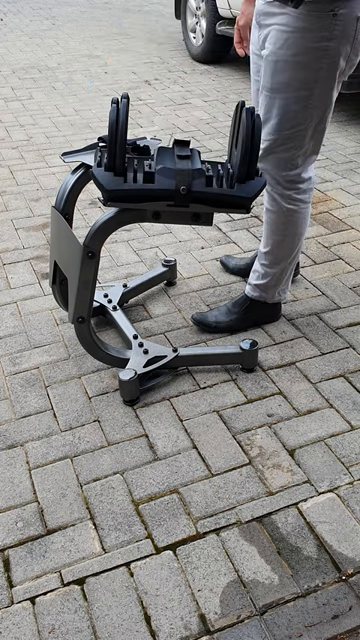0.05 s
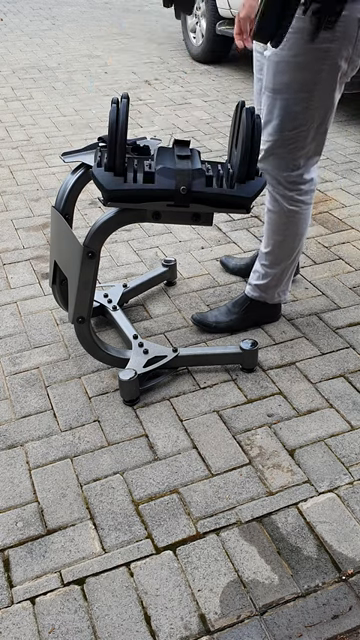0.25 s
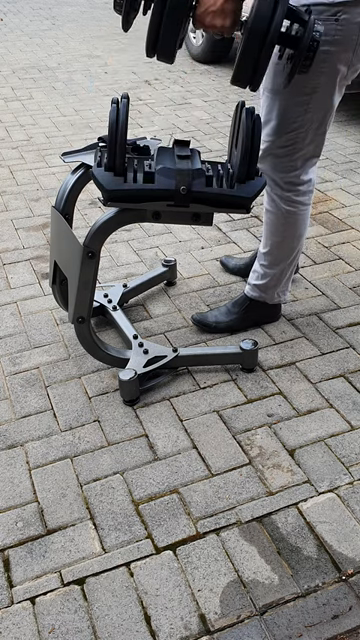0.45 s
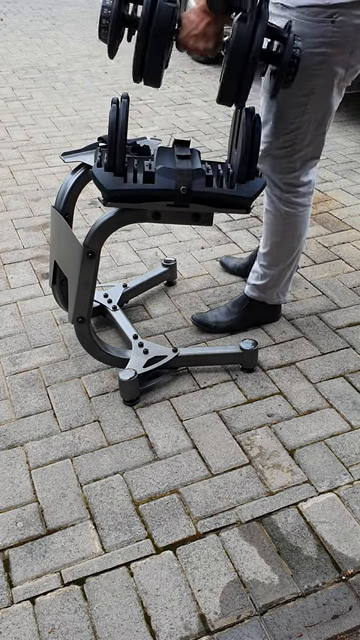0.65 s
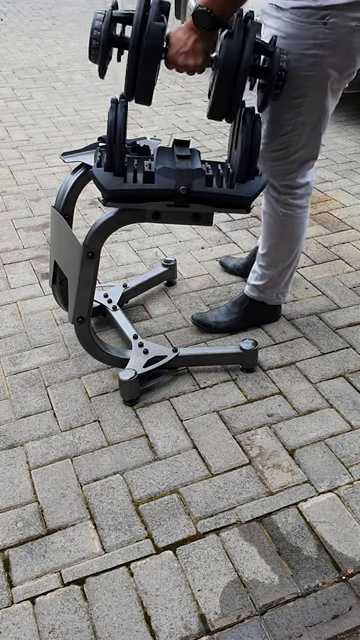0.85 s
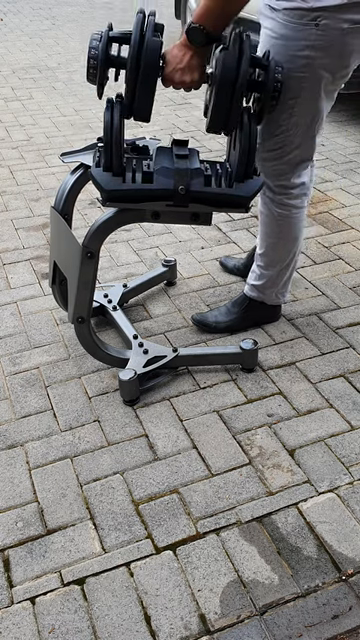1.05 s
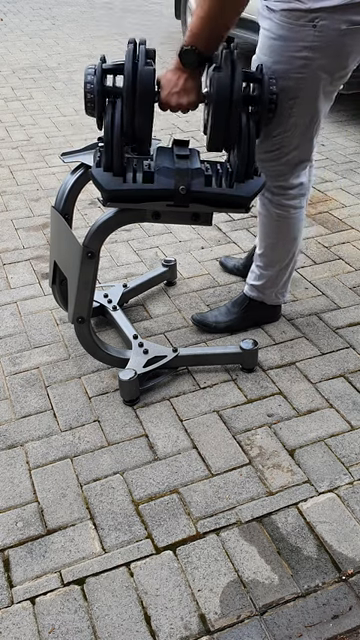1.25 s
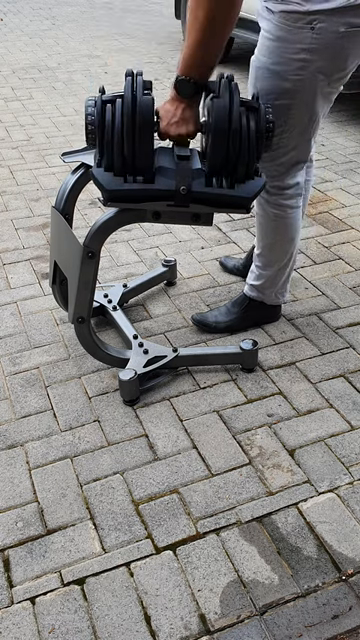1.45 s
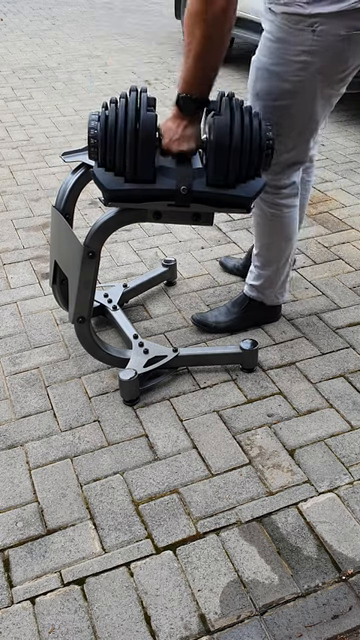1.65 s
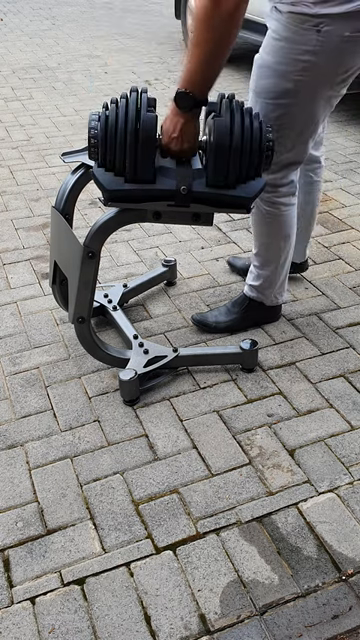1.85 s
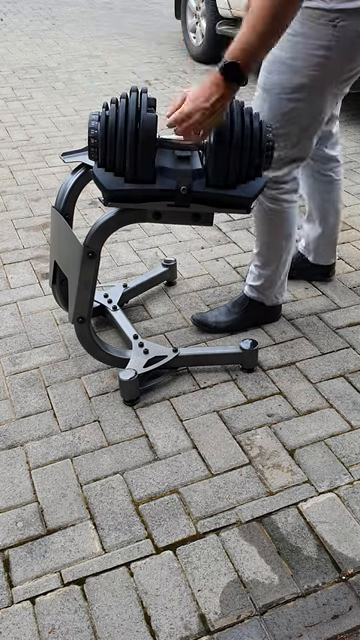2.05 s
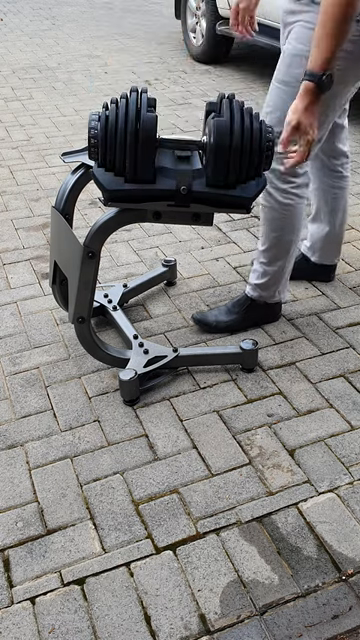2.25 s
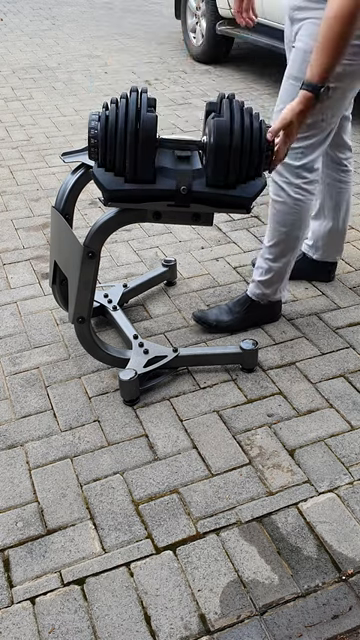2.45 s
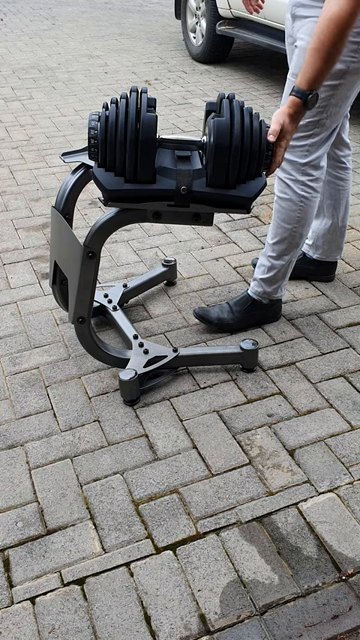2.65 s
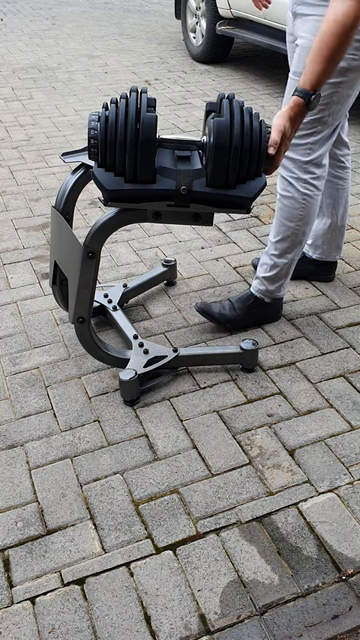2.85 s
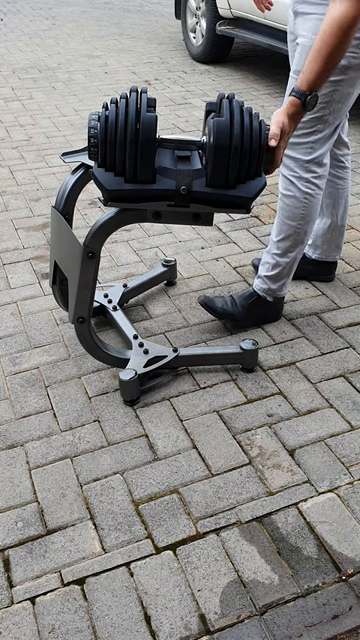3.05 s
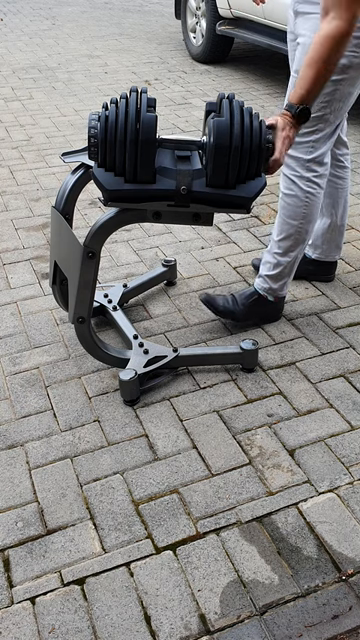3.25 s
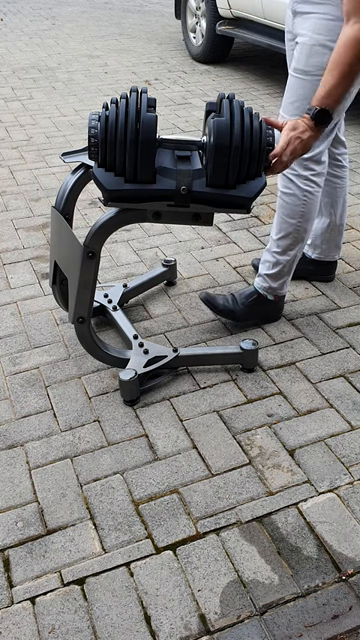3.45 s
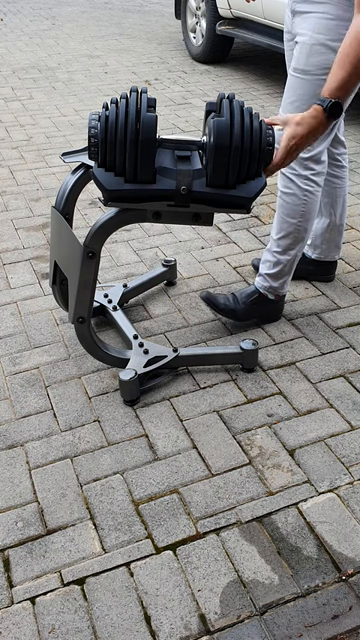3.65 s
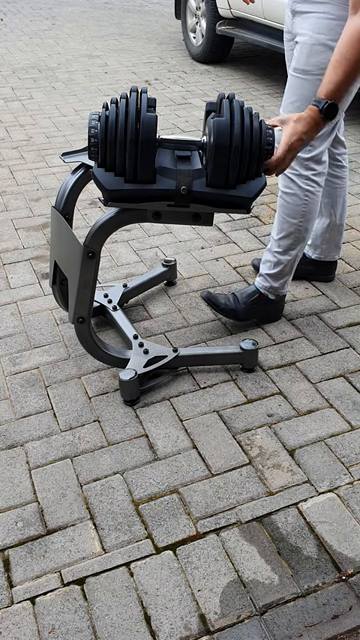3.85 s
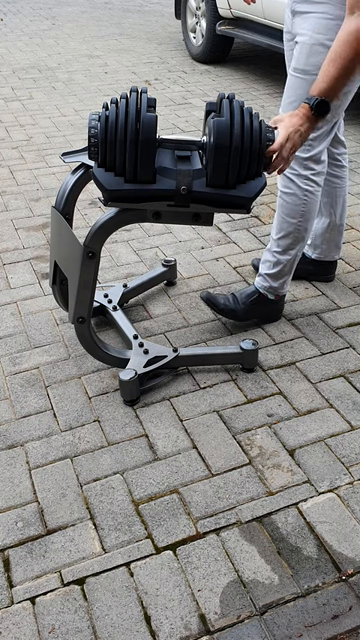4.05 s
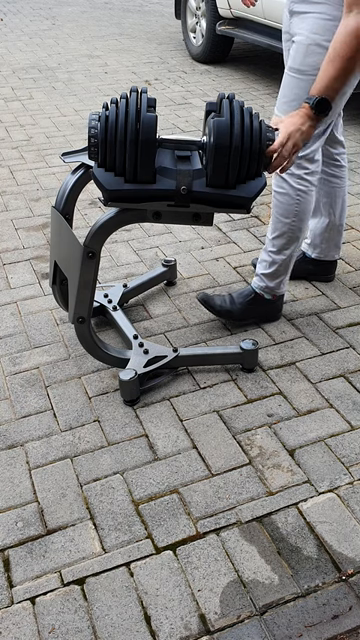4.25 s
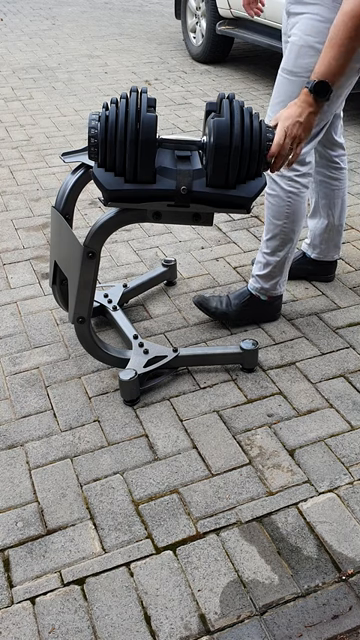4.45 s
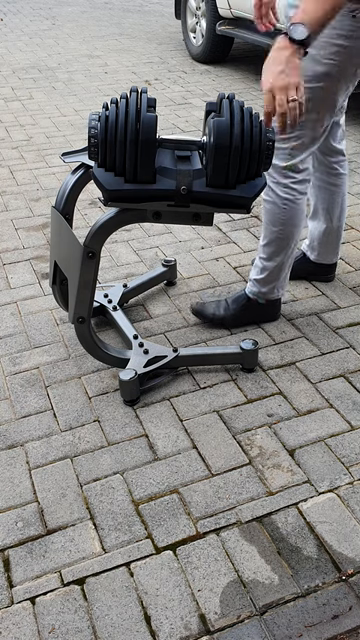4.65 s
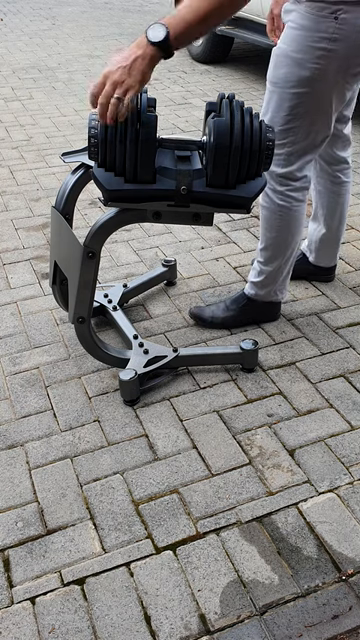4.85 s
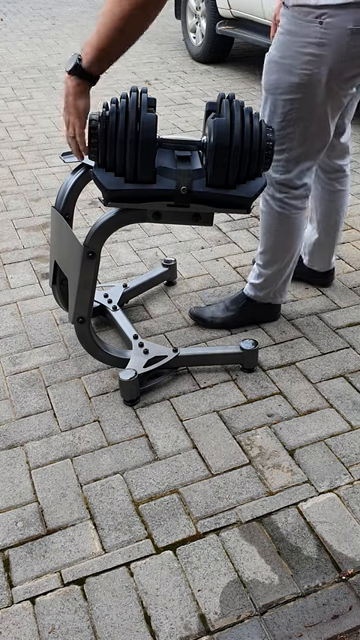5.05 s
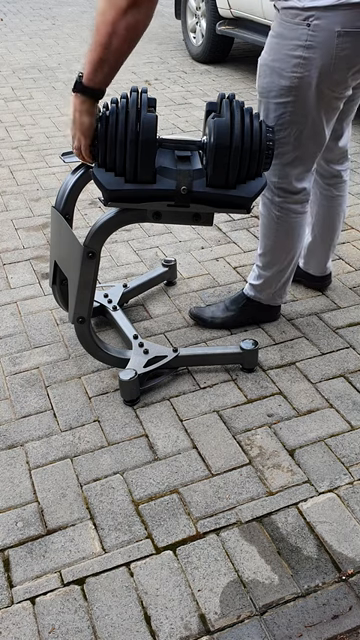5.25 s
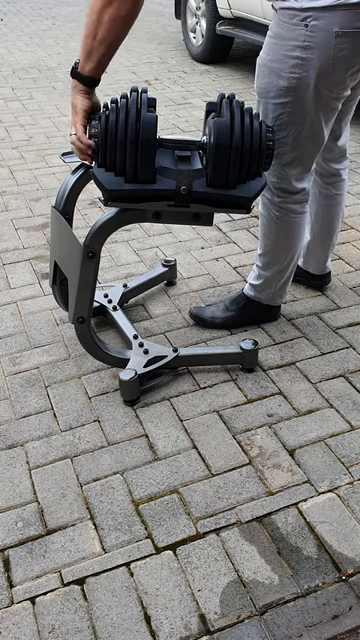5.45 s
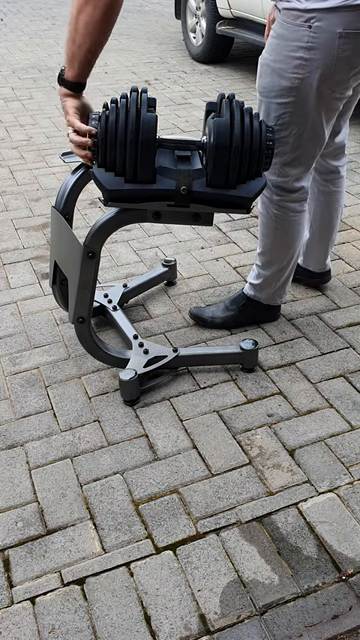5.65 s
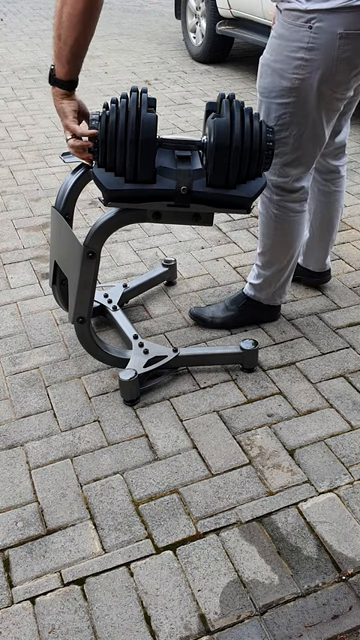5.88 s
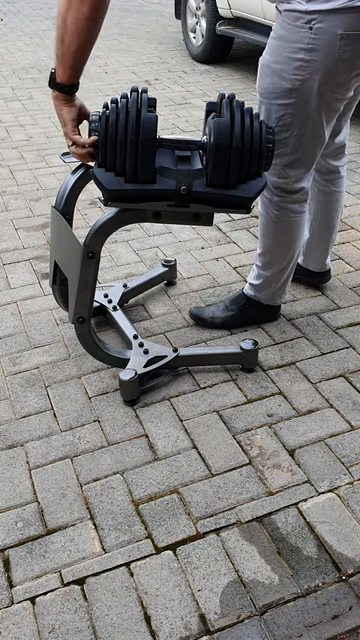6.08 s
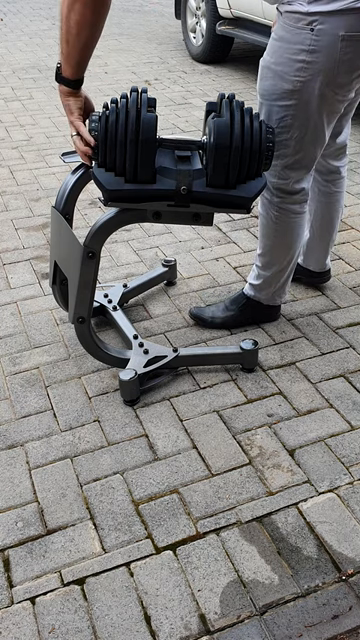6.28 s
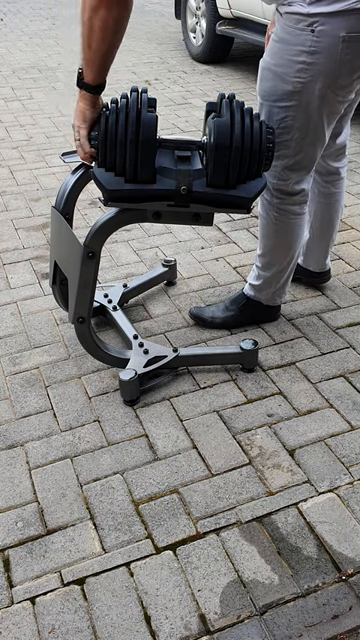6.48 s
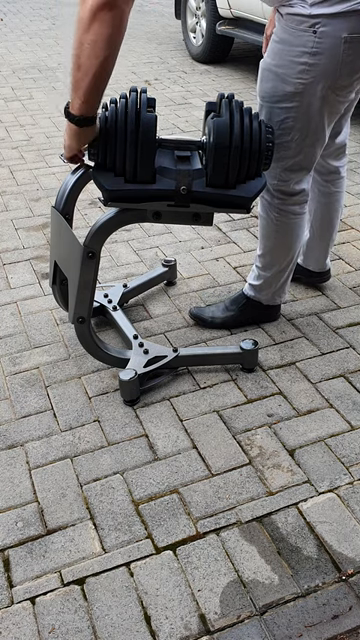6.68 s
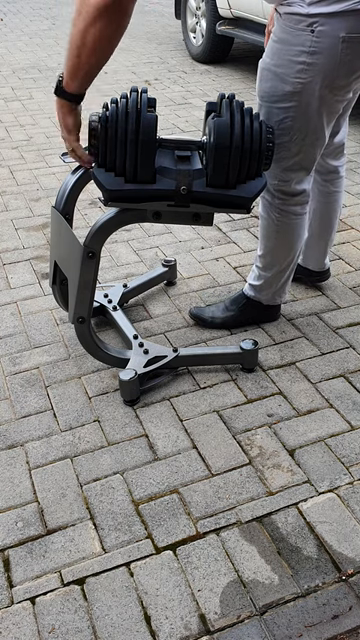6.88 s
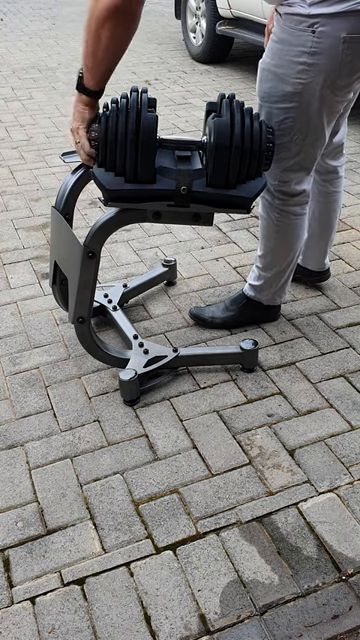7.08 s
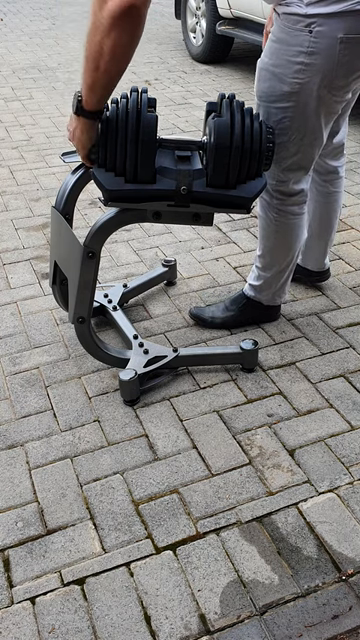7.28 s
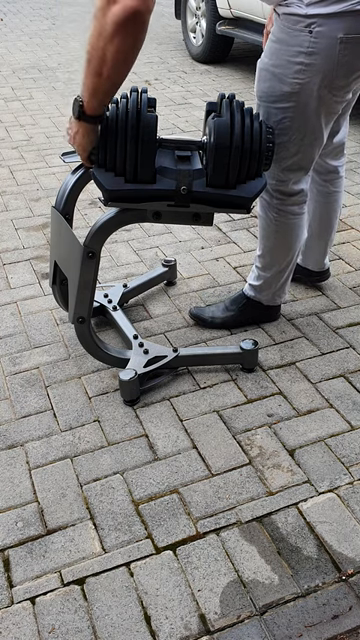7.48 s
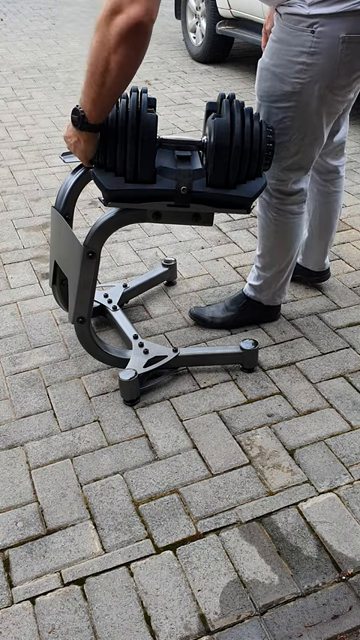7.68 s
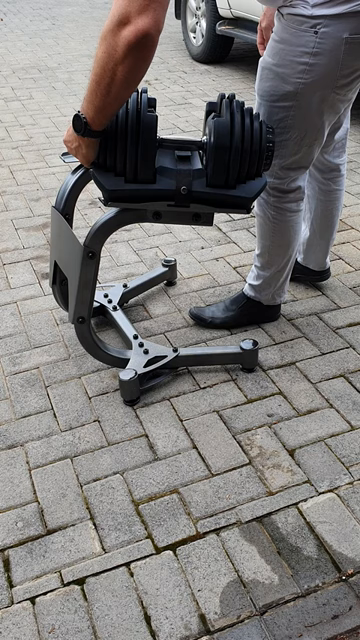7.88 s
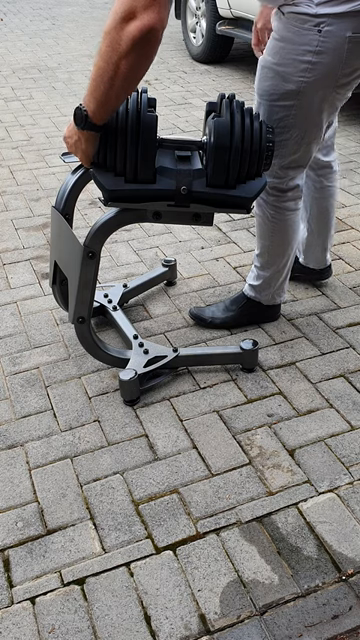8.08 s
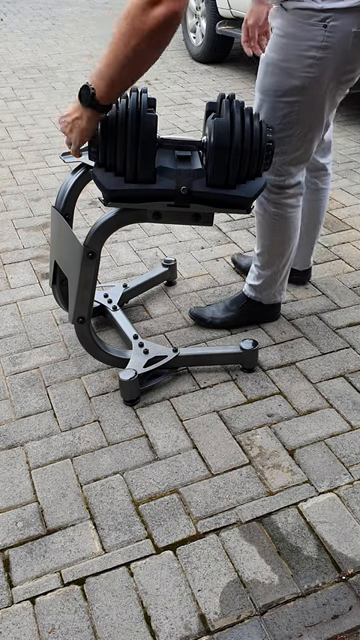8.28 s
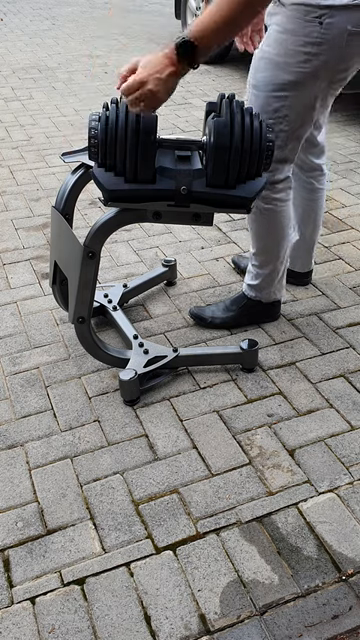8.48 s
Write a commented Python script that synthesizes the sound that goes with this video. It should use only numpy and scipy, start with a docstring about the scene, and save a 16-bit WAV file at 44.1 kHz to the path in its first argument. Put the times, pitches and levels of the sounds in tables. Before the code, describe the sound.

Outdoors on paving near walls, an adjustable dumbbell lightly bumps spare plates, then scrapes down and lands with a rapid cluster of heavy iron clunks, the plates rocking to rest. After a pause, a hand turns the dial at one end with sharp springy clicks, then the other end with louder snaps, plate rattles and short squeaks. Close small stereo microphone, low rumble and faint distant engine behind.

```python
"""Over a low outdoor rumble, iron bumps iron: an adjustable dumbbell is lowered into its cradle on a steel stand.
It bumps the spare plates, scrapes down between them and lands in a cluster of clunks; the plates rock to rest.
A hand then turns the weight dial at each end: sprung detents snap and ping, loose plates slip, a dial squeaks.
Blows and snaps are random scatters of clicks plus dying sines; squeaks and whistles are gliding tones.
Paving and nearby walls throw it all back; behind it lie air noise, thin whistles and a far idling engine."""
import sys
import numpy as np
from scipy import signal
from scipy.fft import rfft, irfft
from scipy.io import wavfile
from scipy.ndimage import uniform_filter1d

SR = 44100
rng = np.random.default_rng(int(sys.argv[2]) if len(sys.argv) > 2 else 0)


def digitize_waveform(pressure):
    """Quantize a signal to 16-bit integers and store it at the path in sys.argv[1].

    Rows of a 2-D input are taken as channels; values are limited to [-1, 1].
    """
    field = np.atleast_2d(pressure).T
    bounded = np.clip(field, -1, 1)
    quanta = np.round(bounded * 32767).astype(np.int16)
    wavfile.write(sys.argv[1], SR, quanta)


N = 375732  # length of the scene, samples
T = np.arange(32768) / SR  # clock of one short sound, s


def amp(db):
    """Turns decibels into a gain."""
    return 10 ** (np.asarray(db) / 20)


def unit(x):
    """Scales to an energy of one."""
    return x / np.sqrt(np.sum(x ** 2) + 1e-20)


def evened(x):
    """Scales to an rms of one."""
    return x / np.sqrt(np.mean(x ** 2) + 1e-20)


def read(points, hz):
    """Joins (Hz, value) points on a log-frequency axis."""
    f, value = np.transpose(points)
    return np.interp(np.log(hz + 1), np.log(f + 1), value)


def add(mix, s, sound):
    """Mixes a stereo sound in at time s."""
    part = mix[:, max(round(s * SR), 0):][:, :sound.shape[1]]
    part += sound[:, :part.shape[1]]


def through(x, response):
    """Convolution, cut to the length of one sound."""
    return signal.fftconvolve(x, response)[:len(T)]


def contact(colour, tilt_db=0, size=2048):
    """One causal click of the given spectrum; harder contacts tilt it upwards, in dB per octave."""
    hz = abs(np.fft.fftfreq(size, 1 / SR))
    gain_db = read(colour, hz) + tilt_db * np.log2((hz + 100) / 1000)
    log_gain = np.log(amp(np.maximum(gain_db, -90)))
    # minimum phase: all the energy comes as early as the spectrum allows
    spectrum = np.exp(np.conj(signal.hilbert(log_gain)))
    return unit(np.fft.ifft(spectrum).real)


def ring(modes, spread=0.):
    """Dying sines of random sign; with spread, each blow lands on slightly different pitches."""
    hz, energy_db, t60 = np.transpose(modes)[:, :, None]
    hz = hz * (1 + spread * rng.standard_normal(hz.shape))
    sign = rng.choice([-1, 1], hz.shape)
    decay = amp(energy_db - 60 * T / t60) / np.sqrt(t60)  # equal energy for long and short modes
    return unit(np.sum(sign * decay * np.sin(2 * np.pi * hz * T), 0))


def chatter(decay_s, first, per_s):
    """A first touch, then a dying scatter of small rebounds."""
    touches = rng.standard_normal(len(T)) * (rng.random(len(T)) < per_s / SR)
    rebounds = touches * np.exp(-T / max(decay_s, 1e-4))
    return unit(unit(rebounds) + first * (T == 0))


def stroke(length, per_s, grip):
    """Slips of a short slide: they swell and fade as the surfaces catch and let go."""
    u = T / max(length, 1e-3)
    slips = rng.standard_normal(len(T)) * (rng.random(len(T)) < per_s / SR)
    first_catch = grip * np.exp(-length / 0.014) * (T == 0)  # strongest in short slides
    return unit(unit(slips * u * np.exp(-2 * u)) + first_catch)


# likeness of the two ports in a diffuse field: pitch_hz, likeness (limited to 1)
PORT_LIKENESS = [(60, 1.05), (200, 0.68), (450, 0.42), (900, 0.04), (16000, 0)]


def stereo_noise(n, size=512):
    """Short-time spectra of a diffuse field at two ports: alike in the bass only."""
    hz, t, (a, b) = signal.stft(rng.standard_normal((2, n)), SR, nperseg=size)
    same = np.clip(read(PORT_LIKENESS, hz), -1, 1)[:, None]
    return hz[:, None], t, np.array([a, same * a + np.sqrt(1 - same ** 2) * b])


# reverberation between the walls: pitch_hz, t60_s
WALL_DECAY = [(100, .7), (250, .46), (600, .5), (1400, .48), (2700, .39), (5000, .33), (10000, .27),
              (16000, .21)]
# two ways round the microphone body to the right port: delay_s, gain
RIGHT_PORT_WAYS = [(.00032, .65), (.00052, .5)]


def heard(dry, wet_db, left_db, build_s=0.001, ground=0.13, ground_s=0.0043):
    """The sound reaches the left port first, bounces off the paving and swells between the walls."""
    hz, t, z = stereo_noise(len(T))
    tail = signal.istft(z * amp(-60 * t / read(WALL_DECAY, hz)))[1][:, :len(T)]
    tail = tail * (1 - np.exp(-T / build_s))
    paths = amp(wet_db) * np.sqrt(2) * unit(tail)
    for side, ways, db in ((0, [(0, 1)], left_db), (1, RIGHT_PORT_WAYS, -left_db)):
        for delay, gain in ways:
            paths[side, round(delay * SR)] += gain * amp(db / 2)
            paths[side, round((ground_s + delay) * SR)] += gain * ground
    return signal.fftconvolve(dry[None], paths, axes=1)


# a blow chatters for CHATTER_S at FIRM_DB; lighter ones chatter longer, twice as long for every SKID_DB less
CHATTER_S, FIRM_DB, SKID_DB = 0.0072, -19, 27.5
# blows of the dumbbell on plates and cradle: start_s, level_db (before the layer gain), bright_db_per_octave
BLOWS = [(.836, -40.5, -1.5), (0.842, -34.5, -1.5), (.871, -36.5, 1.5), (1.202, -39, 2), (1.287, -43, 2.5),
         (1.414, -22.5, -0.9), (1.438, -20.5, -2.5), (1.457, -21.5, -2), (1.479, -26.5, 3),
         (1.516, -23.5, 2), (1.584, -15, -1), (1.599, -15.5, 1.5), (1.616, -23.5, 5.5), (6.013, -57, -6.5)]
# colour of iron on iron: pitch_hz, density_db (per Hz, relative)
IRON_COLOUR = [(30, -28), (95, -21), (140, -9), (200, -2), (340, -4), (480, 1.5), (760, -7.5), (1000, -6),
               (1550, -4.5), (2900, -15.5), (4000, -18), (7500, -35), (12000, -39.5), (16000, -51.5)]
# modes of the steel stand: pitch_hz, energy_db (relative), t60_s
STAND_MODES = [(102, -4, .55), (200, -4, .22), (276, -1, .25), (440, 0, .26), (504, -3, .26),
               (704, -4, .42), (751, -4, .36), (791, -2, .36), (871, -5, .32), (1207, -8, .3),
               (1522, -9, .2), (1695, -10, .2), (2243, -10, .28)]


def dumbbell(level_db=25, stand_db=-8, thud_db=-13, thud_hz=200):
    """Iron lands on the plates and cradle with a low thud, chatters, and sets the stand ringing."""
    out = np.zeros((2, N))
    for s, db, bright_db in BLOWS:
        decay_s = CHATTER_S * 2 ** ((FIRM_DB - db) / SKID_DB)
        blow = through(chatter(decay_s, first=0.48, per_s=3000), contact(IRON_COLOUR, bright_db))
        push = np.sin(2 * np.pi * thud_hz * T) * T * np.exp(-T / 0.0018)
        thud = amp(thud_db) * unit(np.gradient(push))
        # dull, heavy blows move the whole frame
        body = (thud + amp(stand_db) * ring(STAND_MODES)) * amp(-2 * bright_db)
        add(out, s, amp(db + level_db) * heard(blow + body, wet_db=1, left_db=2.0))
    return out


# force of the scrape between the spare plates, harder once wedged in: time_s, level_db (before the layer gain)
SCRAPE_FORCE = [(1.1, -65.5), (1.19, -51), (1.405, -50.5), (1.44, -29.5), (1.53, -30.5), (1.58, -42)]


def slide(level_db=-3, bright_db=1.5, per_s=900):
    """Iron scrapes along the spare plates: a stream of small random contacts."""
    s, db = np.transpose(SCRAPE_FORCE)
    force = np.interp(np.arange(N) / SR, s, amp(db + level_db), left=0, right=0)
    touches = evened(rng.standard_normal(N) * (rng.random(N) < per_s / SR))
    scrape = signal.oaconvolve(force * touches, contact(IRON_COLOUR, bright_db))
    return heard(scrape, wet_db=1.5, left_db=2.5)[:, :N]


# the first rock, then how each later one is weaker (dB) and thinner (dB per octave)
ROCK_START_S, ROCK_EVERY_S, ROCK_LENGTH_S = 1.683, 0.065, 0.005
ROCK_DB, ROCK_FADE_DB, ROCK_BRIGHT_DB, ROCK_THINS_DB = -28.5, 5.5, -8.5, 3.5


def rocking(count=4):
    """After the landing the plates rock to rest: rows of start_s, level_db, length_s, bright_db_per_octave."""
    rocks = []
    for k in range(count):
        level_db = ROCK_DB - k * ROCK_FADE_DB
        bright_db = ROCK_BRIGHT_DB + k * ROCK_THINS_DB
        rocks.append((ROCK_START_S + k * ROCK_EVERY_S, level_db, ROCK_LENGTH_S, bright_db))
    return rocks


# a shift of SHIFT_USUAL_DB has SHIFT_BRIGHT_DB per octave; heavier ones are duller by SHIFT_DULLS for every dB more
SHIFT_BRIGHT_DB, SHIFT_USUAL_DB, SHIFT_DULLS = 2, -47.5, 0.27
# loose plates shifting in their slots as the hand takes hold or lets go:
# start_s, level_db (before the layer gain), length_s (time scale of the swell and fade)
PLATE_SHIFTS = [(0.583, -71.5, .02), (2.747, -54, 0.013), (2.997, -47, .011), (3.792, -49.5, 0.026),
                (5.295, -55.5, 0.035), (5.449, -47.5, .025), (5.827, -50.5, 0.0036), (6.01, -54.5, .0044),
                (6.335, -54.5, 0.013), (6.361, -48.5, .008), (6.41, -36.5, 0.021), (6.445, -40.5, .012),
                (6.561, -38.5, 0.018), (6.782, -45, .012), (6.802, -48, .012), (7.084, -54, .012),
                (7.102, -39.5, .01), (7.128, -40.5, .013), (8.148, -62, 0.014), (8.401, -60.5, 0.069)]
# colour of plates in the plastic cradle: pitch_hz, density_db (per Hz, relative)
CRADLE_COLOUR = [(100, -22.5), (220, -19.5), (380, -10.5), (560, -1.5), (720, 1.5), (930, -15.5),
                 (1250, -12.5), (1700, -9.5), (2050, -25.5), (4200, -31), (6000, -47.5), (15000, -60.5)]


def plates(level_db=25.0):
    """Loose plates stick and slip in the hollow plastic cradle."""
    out = np.zeros((2, N))
    shifts = []
    for s, db, length in PLATE_SHIFTS:
        shifts.append((s, db, length, SHIFT_BRIGHT_DB - SHIFT_DULLS * (db - SHIFT_USUAL_DB)))
    for s, db, length, bright_db in rocking() + shifts:
        slips = through(stroke(length, per_s=4800, grip=0.45), contact(CRADLE_COLOUR, bright_db))
        add(out, s, amp(db + level_db) * heard(slips, wet_db=3.5, left_db=3.0))
    return out


# what a detent wakes in each dial, before the layer gains:
# housing_db (over the snap), low_handle_db (over the snap), high_handle_db (over the spring)
DIAL_ONE = (-11.5, -11.5, -10.5)
DIAL_TWO = (-14.5, -12, -16)


def dial_at(s, swap_s=4.8):
    """The dial that the hand is turning at time s: one end first, the other from swap_s."""
    return DIAL_ONE if s < swap_s else DIAL_TWO


# notches of the dials: start_s, snap_db, spring_db (both before the layer gains)
NOTCHES = [(2.8247, -32.5, -40.5), (2.8442, -38, -53), (3.0898, -25.5, -27.5), (3.1898, -26, -32),
           (3.2769, -29.5, -35.5), (3.7871, -38.5, -43), (3.8862, -25.5, -29), (4.0453, -30, -26.5),
           (5.3697, -25, -30), (5.4475, -34, -47), (5.533, -36.5, -59), (6.4947, -21, -36.5),
           (6.5347, -19, -27), (6.5644, -20, -45.5), (6.678, -25, -34.5), (7.1474, -29, -32),
           (7.211, -15.5, -29.5), (7.2981, -25, -39.5), (7.7304, -27, -42), (7.7613, -30, -49)]
# colour of the snap: pitch_hz, density_db (per Hz, relative)
NOTCH_COLOUR = [(300, -33), (2000, -14), (2900, -8.5), (3400, -6.5), (4050, -2.5), (4600, -5.5),
                (5800, -14.5), (7000, -11), (7700, -20), (10000, -17), (12200, -17.5), (14000, -24),
                (16000, -46.5)]
# modes of the detent pawl: pitch_hz, energy_db (relative), t60_s
PAWL_MODES = [(3130, -6, 0.0033), (3864, 15, 0.012), (4014, 18.5, 0.021)]
# modes of the detent spring: pitch_hz, energy_db (relative), t60_s
SPRING_MODES = [(6950, -11, .025), (10380, -1, .05), (10500, 1, .07), (14060, -2, .05), (15500, -18, .03)]
# modes of the dial housing: pitch_hz, energy_db (relative), t60_s
HOUSING_MODES = [(680, 1, .03), (1120, -5, .035), (1580, 0, .022), (2400, -7, .01)]


def dials(snap_db=15, pawl_db=12, spring_db=22, housing_db=20):
    """A sprung detent drops into each notch: a hard snap, a ping of steel and a knock in the housing."""
    out = np.zeros((2, N))
    for s, snap, spring in NOTCHES:
        housing, _, _ = dial_at(s)
        seating = 1 - np.exp(-T / 0.0013)  # the detent takes a moment to seat
        bounces = through(chatter(0.0033, first=0.1, per_s=8000), contact(NOTCH_COLOUR))
        click = amp(snap + snap_db) * unit(seating * bounces)
        pawl = amp(snap + pawl_db) * ring(PAWL_MODES, spread=0.0071)
        ping = amp(spring + spring_db) * ring(SPRING_MODES, spread=.002)
        knock = amp(snap + housing + housing_db) * ring(HOUSING_MODES, spread=0.012)
        add(out, s, heard(click + seating * (pawl + ping), wet_db=-1.0, left_db=5))
        add(out, s, heard(knock, wet_db=-1.5, left_db=0))
    return out


# long low mode of the handle: pitch_hz, energy_db (relative), t60_s
HANDLE_LOW = [(2550, 0, .5)]
# long high modes of the handle: pitch_hz, energy_db (relative), t60_s
HANDLE_HIGH = [(4390, 0, .7), (6550, -8, .5)]


def handle(level_db=15):
    """The steel sings on faintly after each detent, in step with its strength."""
    out = np.zeros((2, N))
    for s, snap, spring in NOTCHES:
        _, low_db, high_db = dial_at(s)
        song = amp(snap + low_db) * ring(HANDLE_LOW) + amp(spring + high_db) * ring(HANDLE_HIGH)
        add(out, s, amp(level_db) * heard(song, wet_db=-8, left_db=0))
    return out


# squeaks of a dial: start_s, length_s, level_db, first_pitch_hz, last_pitch_hz (before the waver)
DIAL_SQUEAKS = [(3.022, 0.17, -48, 2650, 2520), (3.145, 0.08, -61, 3340, 3330),
                (6.511, 0.037, -27, 1798, 1420), (6.578, 0.017, -32.5, 2470, 2552),
                (7.155, 0.072, -42, 2570, 2580), (7.244, 0.035, -32.5, 2327, 2787)]
# faint thin whistles: start_s, length_s, level_db, first_pitch_hz, last_pitch_hz (before the waver)
THIN_WHISTLES = [(1.09, 0.12, -58, 2147, 2310), (1.9, .78, -78, 1002, 1004),
                 (1.95, 0.18, -69.5, 2784, 2696), (2.19, 0.2, -68, 2696, 2570),
                 (2.45, .27, -69, 2845, 2594), (2.28, .4, -82.5, 3412, 3430),
                 (6.09, 0.26, -87.5, 3090, 2820), (7.6, 0.042, -73, 2920, 2777),
                 (8.43, 0.078, -67.5, 2840, 2685)]


def glides(rows, waver, wet_db, rough, octave_db):
    """Short unsteady tones that slide in pitch and flutter in strength."""
    out = np.zeros((2, N))
    for s, length, db, first_hz, last_hz in rows:
        u = np.minimum(T / length, 1)
        wobble, flutter = evened(uniform_filter1d(rng.standard_normal((2, len(T))), size=120))
        pitch_hz = (first_hz + (last_hz - first_hz) * u) * (1 + waver * wobble)
        phase = 2 * np.pi * np.cumsum(pitch_hz) / SR
        tone = np.sin(phase) + amp(octave_db) * np.sin(2 * phase)
        swell = np.sqrt(np.sin(np.pi * u).clip(0))
        tone = tone * evened(1 + rough * flutter) * swell
        add(out, s, amp(db) * heard(tone, wet_db, left_db=1))
    return out


# trouser cloth and skin brushing: start_s, level_db (near the rms), length_s (time scale of the swell and fade)
BRUSHES = [(1.979, -62.5, 0.028), (2.148, -77.5, 0.26), (4.954, -77.5, 0.11)]
# colour of the brushing: pitch_hz, density_db (per Hz, relative)
BRUSH_COLOUR = [(300, -4), (1600, 6.5), (3500, -2.5), (6000, -6), (9000, -18), (15000, -16)]


def cloth():
    """Soft brushing: very many tiny slips."""
    out = np.zeros((2, N))
    for s, db, length in BRUSHES:
        brush = through(stroke(length, per_s=11000, grip=0), contact(BRUSH_COLOUR))
        strength = amp(db) * np.sqrt(length * SR)  # longer brushes hold more energy
        add(out, s, strength * heard(brush, wet_db=3, left_db=1))
    return out


# colour of the air noise: pitch_hz, density_db (per Hz, relative)
AIR_COLOUR = [(59, -44.5), (100, -8), (143, -9.5), (249, -15), (277, -13), (315, -18.5), (558, -25.5),
              (621, -23.5), (691, -26.5), (1800, -32.5), (4200, -37.5), (6700, -49), (16000, -49)]
# colour of the rumble: pitch_hz, density_db (per Hz, relative)
RUMBLE_COLOUR = [(15, -33), (32, -10.5), (50, 6.5), (70, -0.5), (100, -12.5), (140, -31), (250, -46.5),
                 (600, -90)]
# swell of the outdoor rumble: time_s, level_db (before the layer gain)
RUMBLE_SWELL = [(0.0, -63), (0.47, -58), (1.75, -60), (2.13, -70.5), (4.17, -60.5), (4.45, -67.5),
                (7.22, -63), (7.53, -72), (8.5, -68.5)]
# swell of a distant engine idling: time_s, level_db (before the side balance)
ENGINE_SWELL = [(0, -76), (2.4, -63), (5.5, -55), (6.9, -59.5), (8.5, -64.5)]


def outdoors(air_db=-70, air_drift_db=1.1, idle_hz=72, upper_db=-6, rumble_db=7):
    """Soft drifting air noise, a lumpy rumble and a far engine of two wavering tones."""
    t = np.arange(N) / SR
    hz, frames, z = stereo_noise(N, size=2048)
    drift = uniform_filter1d(rng.standard_normal(z.shape[1:]), size=20, axis=0)  # across pitch
    drift = evened(uniform_filter1d(drift, size=6, axis=1))  # across time
    air = signal.istft(z * amp(read(AIR_COLOUR, hz) + air_drift_db * drift))[1][:, :N]
    air = evened(air) * amp(air_db)

    hz, frames, z = stereo_noise(N, size=4096)
    rumble = evened(signal.istft(z * amp(read(RUMBLE_COLOUR, hz)))[1][:, :N])
    rumble = rumble * amp(np.interp(t, *np.transpose(RUMBLE_SWELL)) + rumble_db)

    wobble = np.interp(t, frames, rng.standard_normal(len(frames)))
    phase = 2 * np.pi * np.cumsum(idle_hz * (1 + 0.048 * wobble)) / SR
    idle = np.sin(phase) + amp(upper_db) * np.sin(3 * phase / 2)
    idle = idle * amp(np.interp(t, *np.transpose(ENGINE_SWELL)))
    return air + (rumble + idle) * amp([[-.8], [.8]])  # a little stronger on the right


def scene():
    """Sums the dumbbell, its dials and the outdoor background."""
    squeaks = glides(DIAL_SQUEAKS, waver=.015, wet_db=-1, rough=.4, octave_db=-20)
    whistles = glides(THIN_WHISTLES, waver=.014, wet_db=3, rough=.6, octave_db=-20)
    return dumbbell() + slide() + plates() + dials() + handle() + squeaks + cloth() + whistles + outdoors()


# response of the right port, which loses the top of the treble: pitch_hz, gain_db
RIGHT_RESPONSE = [(10500, 1), (13500, -4), (16000, -4)]


def record(dry, low_hz=38, cut_hz=16000):
    """A small microphone that loses the deepest bass and is duller on the right, then the band limit."""
    left, right = signal.sosfilt(signal.butter(2, low_hz, "high", fs=SR, output="sos"), dry)
    right = irfft(rfft(right) * amp(read(RIGHT_RESPONSE, np.fft.rfftfreq(N, 1 / SR))), N)
    band_limit = signal.firwin(255, cut_hz, window=("kaiser", 8), fs=SR)
    return signal.oaconvolve(np.array([left, right]), band_limit[None], "same")


dry = scene()
out = record(dry)
digitize_waveform(out)
```